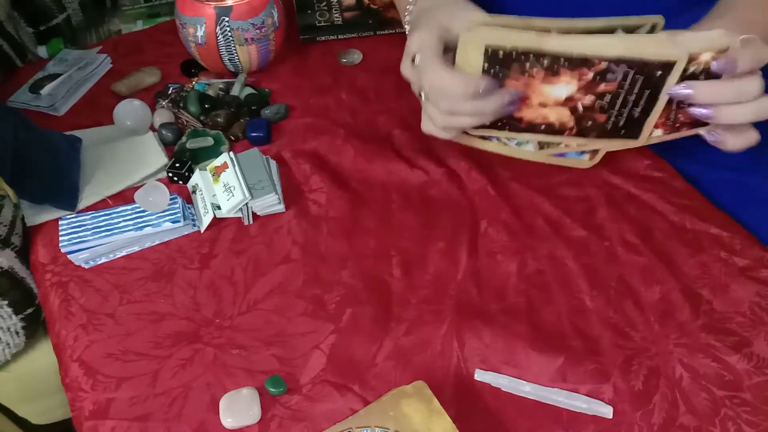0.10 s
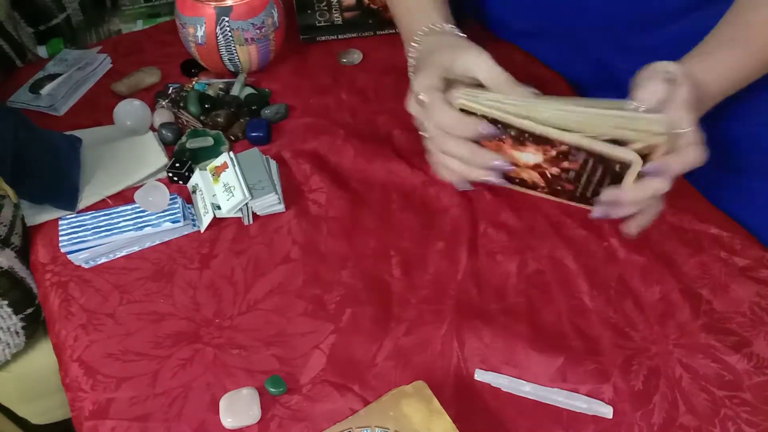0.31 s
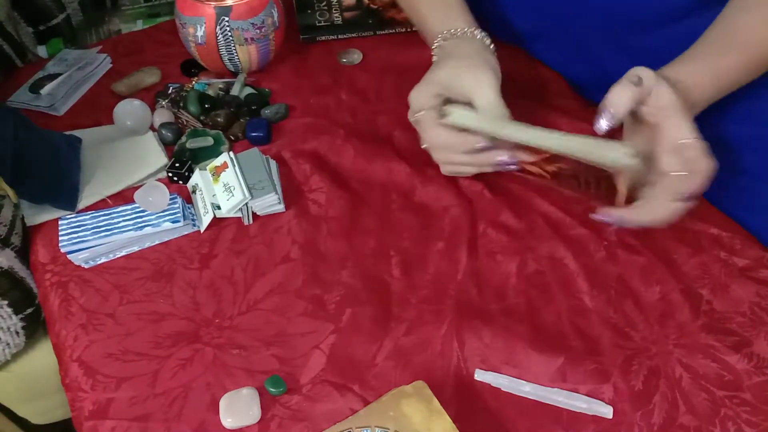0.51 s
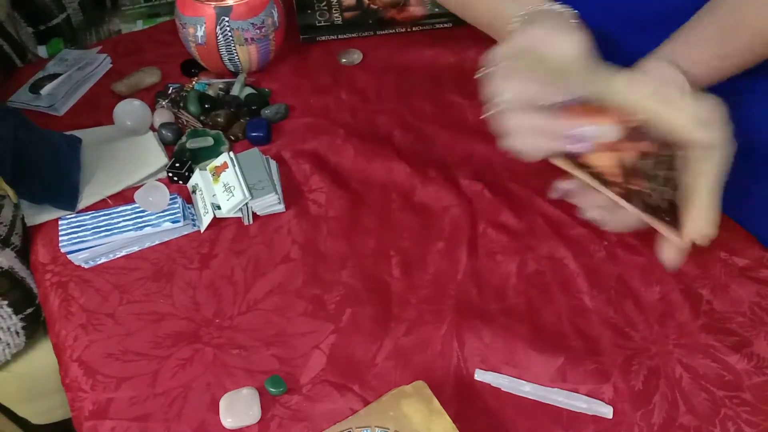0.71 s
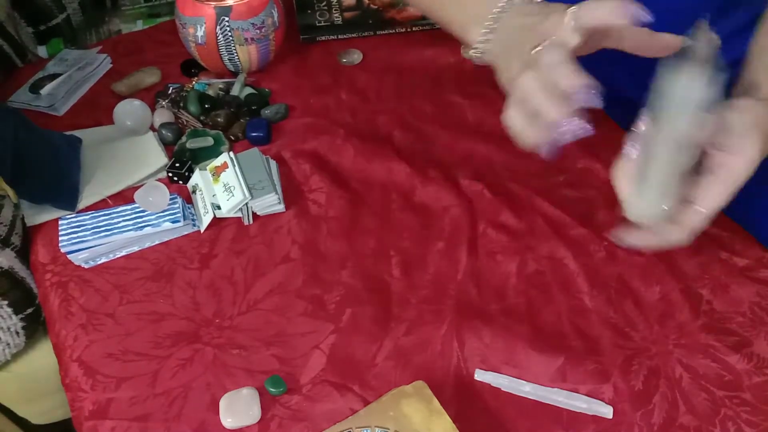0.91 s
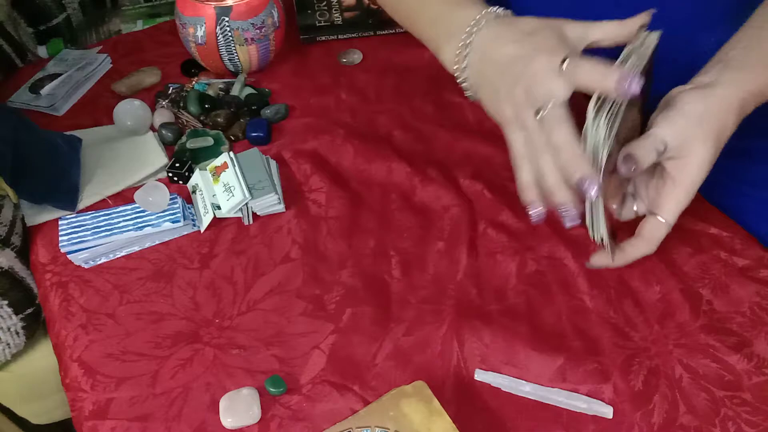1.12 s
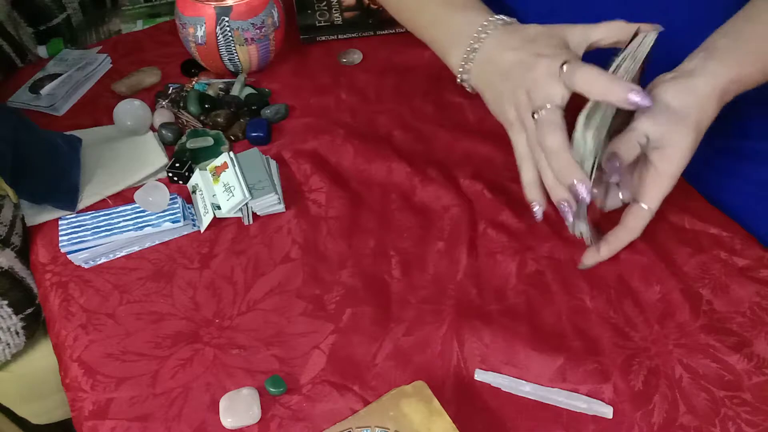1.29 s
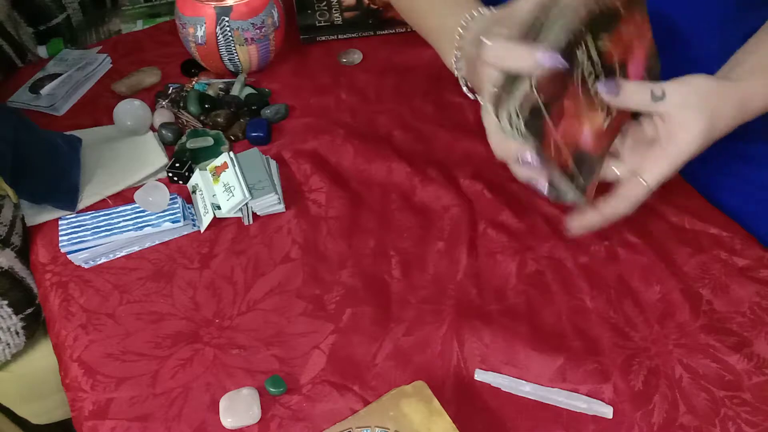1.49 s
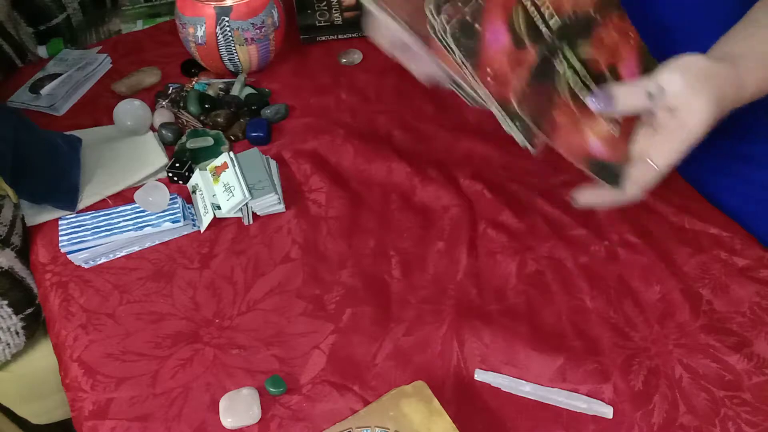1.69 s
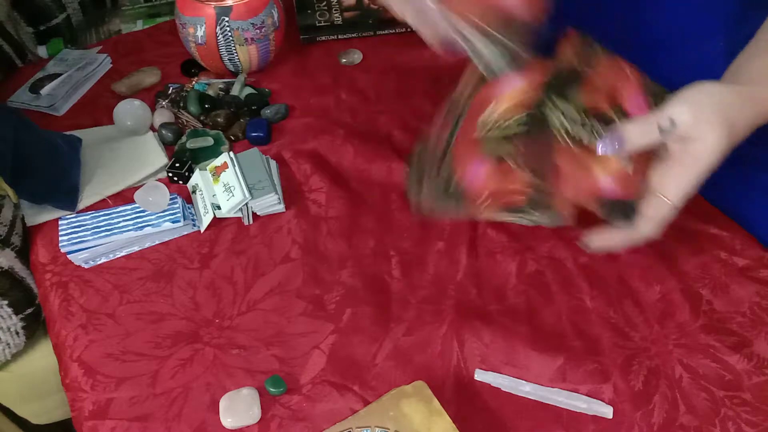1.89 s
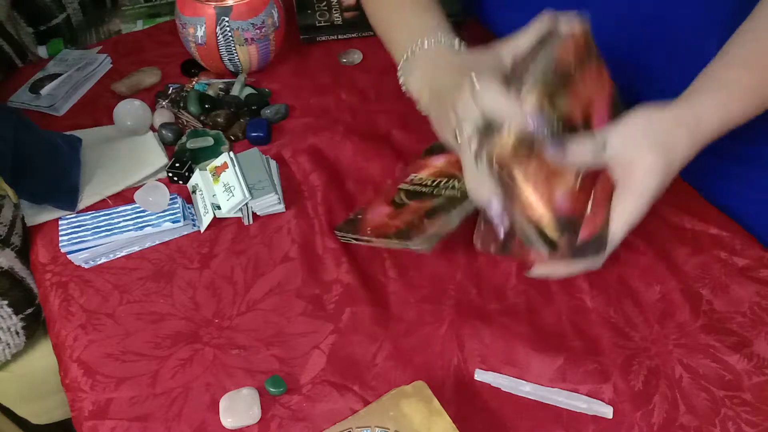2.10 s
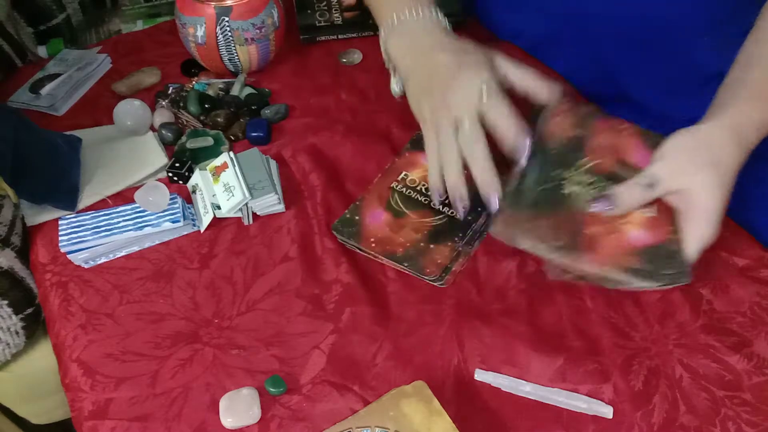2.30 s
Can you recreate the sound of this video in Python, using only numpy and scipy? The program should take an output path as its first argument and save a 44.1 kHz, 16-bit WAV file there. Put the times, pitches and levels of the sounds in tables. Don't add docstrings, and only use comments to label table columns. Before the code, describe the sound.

Large cards shuffled by hand close to the microphone: papery slides and a dull tap on the table, one loud snap, a quieter second, then more sliding, knocks and a card dropping on cloth, in a quiet room.

```python
import sys
import numpy as np
from scipy import signal
from scipy.fft import rfft, irfft, next_fast_len
from scipy.io import wavfile
from scipy.ndimage import uniform_filter1d, map_coordinates

SR = 44100
rng = np.random.default_rng(int(sys.argv[2]) if len(sys.argv) > 2 else 0)


def generate_wav(signal):
    frames = np.transpose(np.atleast_2d(signal))
    scaled = np.clip(frames, -1, 1) * 32767
    pcm = np.round(scaled).astype(np.int16)
    wavfile.write(sys.argv[1], SR, pcm)


def nominal_scale(level):
    x = np.asarray(level, float) / 20
    return 10 ** x


N = 110250

# pitch_hz, level_db (per Hz)
BACKGROUND_HISS = [(20, -38), (50, -8.5), (110, -4), (300, -8.5), (900, -15), (2100, -18.5), (8000, -30.5),
                   (15700, -32)]
# pitch_hz, level_db (per Hz)
AMPLIFIER_HISS = [(18, -41), (30, -4), (974, -7), (1270, -4), (1830, -8), (15600, -24.5)]
BACKGROUND_DB, AMPLIFIER_DB = -70, -76

# peak_s, level_db, fall_s, pitch_hz
RUBS = [(.01, -67, 0.034, 1260), (0.05, -46.5, 0.048, 1162), (.178, -63, 0.029, 2780),
        (0.416, -38.5, 0.011, 7560), (.5, -74.5, 0.31, 1260), (0.787, -54.5, 0.082, 1300),
        (0.84, -56, 0.015, 1280), (1.05, -66, 0.16, 1275), (1.032, -64, 0.034, 1600),
        (.37, -58, 0.24, 1244), (0.415, -38, 0.0052, 2440), (1.393, -73.5, 0.039, 6800),
        (1.48, -66, 0.053, 1680), (1.528, -73.5, 0.077, 1290), (1.59, -74, 0.095, 6900),
        (1.619, -71, 0.025, 3130), (1.673, -60, 0.024, 1290), (1.697, -38.5, 0.021, 1584),
        (1.76, -59, 0.019, 3900), (1.772, -54, 0.047, 10400), (1.8576, -49, 0.022, 1290),
        (1.97, -64, 0.027, 6700), (2.017, -39, 0.038, 1170), (2.067, -48, 0.014, 1800),
        (2.134, -41.5, 0.013, 7140), (2.18, -49, 0.08, 1510), (2.284, -64, 0.011, 9300),
        (2.2874, -48.5, 0.013, 1180), (1.08, -70, 0.08, 517)]
RUB_WIDTH, RUB_RISE = 0.07, 9

# peak_s, peak_db, pitch_hz, rise_s, fall_s
BENDS = [(.012, -53, 1234, 0.0097, 0.0087), (.045, -52, 650, 0.013, 0.018),
         (0.06, -38.5, 1083, 0.01, 0.0068), (0.067, -32, 1200, 0.0049, 0.0043),
         (.077, -40.5, 1290, 0.011, .012), (.085, -55.5, 596, 0.06, 0.02), (.12, -63, 1278, 0.022, 0.039),
         (0.201, -68, 1260, .015, 0.019), (.267, -22, 866, 0.0009, 0.0047),
         (.766, -32, 2850, 0.0016, 0.0061), (.865, -56, 1255, 0.015, 0.022),
         (0.999, -61.5, 1245, 0.02, 0.039), (1.1, -67, 1290, 0.072, .06), (1.362, -65, 130, 0.014, 0.018),
         (1.536, -64, 1263, 0.031, 0.037), (1.673, -45, 1296, 0.0033, 0.019),
         (1.79, -53, 1293, 0.022, 0.019), (1.81, -41.5, 873, .005, 0.0067),
         (1.822, -42.5, 1180, 0.0067, 0.0085), (2.007, -20, 3470, 0.0013, 0.0012),
         (2.0643, -27, 1755, .0008, 0.005), (2.185, -33, 179.5, 0.002, .014),
         (2.204, -41, 196.6, 0.0061, 0.043), (2.198, -38, 2910, 0.0099, .006),
         (2.188, -43, 3250, 0.003, .004), (2.265, -56, 1267, 0.0088, .015),
         (2.32, -54.5, 890, 0.014, 0.0086), (1.575, -70.5, 6830, 0.011, 0.024),
         (1.966, -56.5, 6760, 0.0033, .012), (2.0068, -17, 4800, 0.00033, 0.00051),
         (2.287, -37, 1510, .0005, 0.0015), (1.813, -44, 592, .006, 0.014), (.278, -32, 641, 0.013, 0.028),
         (2.105, -36, 750, 0.0029, 0.011)]

# peak_s, level_db, rise_s, fall_s, tilt_db (per octave)
BRUSHES = [(.04, -48, 0.028, 0.074, -3.5), (.175, -67, 0.017, 0.02, -4), (.27, -70, 0.048, 0.031, -1),
           (.682, -63.5, .003, .04, -14), (.745, -69, 0.046, .02, -8), (.6, -80, 0.064, 0.13, -9),
           (1.27, -75, 0.076, 0.12, -4.5), (1.48, -71.5, 0.08, 0.065, -4.5), (1.62, -67, 0.032, 0.047, -6),
           (1.812, -48, 0.015, 0.021, -9), (2.165, -49, 0.026, 0.018, -4), (2.2, -40.5, 0.0093, 0.05, -5.5)]
# peak_s, level_db, rise_s, fall_s, tilt_db (per octave)
SLIDES = [(.065, -47.5, 0.073, 0.057, -2), (.265, -47.5, 0.043, 0.038, 2.5),
          (.352, -45.5, 0.063, 0.077, -1.5), (0.519, -53.5, 0.063, 0.04, -5.5),
          (0.728, -54.5, 0.034, 0.04, 0), (0.852, -52, 0.041, 0.019, -1.5),
          (1.35, -65.5, 0.032, 0.033, -2.5), (1.44, -57.5, 0.095, 0.073, 6), (1.71, -54.5, 0.06, 0.052, -3),
          (1.769, -49.5, 0.042, 0.061, 1), (1.872, -60, 0.02, 0.097, -8.5), (1.941, -60, 0.025, 0.06, -4),
          (2.03, -38.5, 0.039, 0.029, -5), (2.075, -37.5, 0.046, 0.021, -6.5),
          (2.12, -39.5, 0.039, 0.052, -5), (2.205, -39, 0.036, 0.058, -2.5),
          (2.268, -56.5, 0.034, 0.072, -6), (2.319, -63, 0.024, 0.02, -5)]
# pitch_hz, level_db
CARD_COLOUR = [(150, -32), (500, -9), (1000, -1.5), (3800, 2), (4300, -2), (7400, -2.5)]
BUMP_DB, PATCH_DB = 2, 3.5

# time_s, force_db
SQUARING = [
    (.2235, -61),
    (.226, -59.5),
    (.245, -31.5),
    (.264, -27),
    (.278, -20),
    (.29, -26.5),
    (.318, -39.5),
    (.325, -53),
    (.348, -53.5),
]
# pitch_hz, width_hz, level_db
TABLE_TOP = [(100, 25, -7.5), (179.7, 30, -0.5), (317, 32, 2), (378, 59, -1.5), (465.6, 18, 11.5),
             (560, 18, -3.5), (847, 120, -6), (1290, 120, -4.5), (2300, 1500, -21.5)]
CONTACTS_PER_S, CONTACT_SPREAD_DB, CLOTH_SOFT_HZ = 2500, 3, 1800

KNOCK_TIMES = [.2245, .414, .53, .764, 1.35, 1.72, 1.807, 1.856, 1.921, 1.947, 1.991, 2.012, 2.04, 2.062,
               2.104, 2.183, 2.196, 2.317]
# peak_db, pitch_hz, t60_s (time to die away by 60 dB)
KNOCKS = [(-26, 220, 0.046), (-36.5, 660, 0.032), (-52, 127, 0.064), (-29, 504, 0.047), (-47, 133, 0.074),
          (-51.5, 142, 0.085), (-39, 750, 0.073), (-50.5, 610, 0.06), (-37, 660, 0.035), (-46, 750, 0.05),
          (-34, 295, 0.1), (-29.5, 526, 0.15), (-34, 161, 0.085), (-34, 180, 0.18), (-33.5, 710, 0.046),
          (-33.5, 220, 0.094), (-36, 240, 0.093), (-48, 1300, 0.056)]

# start_s, peak_db, tilt_db (per octave), t60_s
SNAPS = [(0.414, -32, 14, 0.026), (0.706, -41, 10, 0.16), (0.756, -35.5, 1.5, 0.2),
         (0.764, -13, 0.5, 0.057), (0.766, -20.5, 1.5, 0.15), (0.837, -50, 2, 0.028),
         (0.971, -42.5, 5, 0.17), (1.342, -39, 5, 0.039), (1.393, -42.5, 2, 0.077), (1.669, -34, -4, 0.065),
         (1.694, -29.5, -3, 0.059), (1.805, -31.5, -8.5, 0.13), (1.821, -49, -11.5, 0.09),
         (1.856, -48, -8.5, 0.025), (1.884, -41.5, -3, 0.044), (1.9125, -36.5, -4, 0.082)]
# start_s, peak_db, tilt_db (per octave)
FALL = [(1.992, -32.5, -3), (1.998, -23, -6), (2.004, -8, -1), (2.01, -19, -8), (2.022, -22.5, -2),
        (2.04, -28, -2), (2.062, -27, -3), (2.088, -34.5, 4), (2.096, -24, -1.1), (2.106, -35.5, -2.8),
        (2.19, -31, -1), (2.196, -23, 0.5), (2.2188, -26, -4), (2.2486, -28.5, -5), (2.286, -39, -6)]
CRACK_T60_S, RATTLE_GAIN, FALL_T60_S, CRACK_DELAY_S = 0.0036, 0.24, 0.04, 0.001

# pitch_hz, t60_s
ROOM = [(200, 0.21), (1300, 0.12), (8000, 0.11)]
ROOM_DB = -11.5
BOX_HZ, BOX_WIDTH_HZ, BOX_DB = 1275, 34, 12.5
# pitch_hz, level_db
MICROPHONE = [(40, -18), (110, 0), (7400, -0.5), (8100, -11.5), (13600, -16.5), (14900, -20.5), (15650, -7),
              (15850, -42)]


def unit(x):
    return x / np.sqrt(np.mean(x ** 2) + 1e-20)


def along(points, hz):
    point_hz, value = np.transpose(points)
    return np.interp(np.log(hz + 1), np.log(point_hz + 1), value)


def filtered(x, response):
    size = next_fast_len(x.shape[-1] + 8192)
    spectrum = rfft(x, size) * response(np.fft.rfftfreq(size, 1 / SR))
    return irfft(spectrum, size)[..., :x.shape[-1]]


def resonance(f, hz, width):
    return 1j * f * width / (hz * hz - f * f + 1j * f * width)


def wobble(rate, size):
    points = rng.standard_normal(int(size * rate / SR) + 4)
    return map_coordinates(points, [np.arange(size) * rate / SR])


def add(out, start_s, x):
    k = round(start_s * SR)
    out[max(k, 0):k + len(x)] += x[max(-k, 0):]


def hiss(spectrum):
    return unit(filtered(rng.standard_normal(N), lambda f: nominal_scale(along(spectrum, f)) * (f < 15750)))


def rubs():
    out, t = np.zeros(N + SR), np.arange(-SR // 5, SR // 5) / SR
    for peak_s, db, fall, hz in RUBS:
        rise = min(RUB_RISE * fall, 0.6)
        length = fall * np.where(t < 0, rise, 1)
        stroke = nominal_scale(-18 * (t / length) ** 2 + 2.5 * wobble(120, size=len(t)))
        width = RUB_WIDTH * hz * (hz / 1000) ** 0.9
        note = filtered(rng.standard_normal(len(t)), lambda f: resonance(f, hz, width) ** 1.2)
        add(out, peak_s + t[0], nominal_scale(db) * stroke * unit(note))
    return out[:N]


def bends():
    out, t = np.zeros(N + SR), np.arange(-SR // 10, SR // 5) / SR
    for peak_s, db, hz, rise, fall in BENDS:
        swell = nominal_scale(db - 20 * (t / np.where(t < 0, rise, fall)) ** 2)
        add(out, peak_s + t[0], swell * np.cos(2 * np.pi * hz * t))
    return out[:N]


def paper(tilt_db, size):
    bumps = rng.standard_normal(40)

    def colour(f):
        tilt = tilt_db * np.log2((f + 200) / 2500)
        own_bumps = BUMP_DB * map_coordinates(bumps, [f / 800], mode="nearest")
        return nominal_scale(along(CARD_COLOUR, f) + tilt + own_bumps)

    return unit(filtered(rng.standard_normal(size), colour))


def patchy(x):
    z = signal.stft(x, nperseg=128)[2]
    patches = uniform_filter1d(rng.standard_normal(z.shape), size=4, axis=0)
    patches = uniform_filter1d(patches, size=6, axis=1)
    return signal.istft(z * nominal_scale(PATCH_DB * unit(patches)), nperseg=128)[1][:len(x)]


def friction(strokes):
    out, t = np.zeros(N + SR), np.arange(-SR // 5, SR // 5) / SR
    for peak_s, db, rise, fall, tilt in strokes:
        stroke = nominal_scale(-18 * (t / np.where(t < 0, rise, fall)) ** 2)
        level = nominal_scale(db + 0.43 * wobble(110, size=len(t)))
        add(out, peak_s + t[0], level * stroke * unit(patchy(paper(tilt, size=len(t)))))
    return out[:N]


def brushes():
    return friction(BRUSHES)


def slides():
    return friction(SLIDES)


def table_top(f):
    ring = sum((-1) ** k * nominal_scale(db) * resonance(f, hz, width)
               for k, (hz, width, db) in enumerate(TABLE_TOP))
    return ring / (1 + 1j * f / CLOTH_SOFT_HZ) ** 2


def squaring():
    time_s, force_db = np.transpose(SQUARING)
    chance, strength = rng.random((2, N))
    hits = (chance < CONTACTS_PER_S / SR) * nominal_scale(-CONTACT_SPREAD_DB * np.log(strength + 1e-3))
    hits = hits * np.sign(rng.standard_normal(N))
    ring = filtered(hits, table_top)
    even = ring / np.sqrt(np.abs(uniform_filter1d(ring ** 2, size=500)) + 1e-12)
    force = nominal_scale(np.interp(np.arange(N) / SR, time_s, force_db, left=-120, right=-120))
    return even * uniform_filter1d(force, size=40)


def knocks():
    out, t = np.zeros(N + SR), np.arange(SR // 4) / SR
    for start_s, (db, hz, t60) in zip(KNOCK_TIMES, KNOCKS):
        push = np.sin(2 * np.pi * hz * t) * nominal_scale(-60 * t * hz / 5.5)
        noise = rng.standard_normal(len(t))
        rumble = unit(filtered(noise, lambda f: resonance(f, hz, 0.74 * hz) ** 2))
        wave = push + 0.6 * rumble * np.minimum(t * hz, 1)
        add(out, start_s, nominal_scale(db) * wave * nominal_scale(-60 * t / t60))
    return out[:N]


def cracks(events):
    out, t = np.zeros(N + SR), np.arange(SR // 5) / SR
    for start_s, db, tilt, t60 in events:
        shape = nominal_scale(-60 * t / CRACK_T60_S) + RATTLE_GAIN * nominal_scale(-60 * t / t60)
        shape = shape * (1 - np.exp(-t / 0.00014))
        add(out, start_s + CRACK_DELAY_S, nominal_scale(db - 2.5) * shape * paper(tilt, size=len(t)))
    return out[:N]


def snaps():
    return cracks(SNAPS)


def falling_card():
    return cracks([(*row, FALL_T60_S) for row in FALL])


def room(x):
    out, step = np.zeros(N + SR), SR // 5
    for k in range(0, N, step):
        hz, t, z = signal.stft(rng.standard_normal(SR // 3), SR, nperseg=256)
        decay = nominal_scale(-60 * t / along(ROOM, hz)[:, None])
        tail = signal.istft(z * decay, SR, nperseg=256)[1]
        echoes = signal.fftconvolve(x[k:k + step], tail / np.linalg.norm(tail))
        add(out, k / SR + 0.004, echoes)
    return out[:N]


def cavity(x):
    return filtered(x, lambda f: (nominal_scale(BOX_DB) - 1) * resonance(f, BOX_HZ, BOX_WIDTH_HZ))


def microphone(x):
    return filtered(x, lambda f: nominal_scale(along(MICROPHONE, f)))


def scene():
    cards = slides() + snaps() + falling_card() + knocks()
    near = cards + squaring() + rubs() + bends()
    near = near + nominal_scale(ROOM_DB) * room(near) + cavity(cards)
    background = nominal_scale(BACKGROUND_DB + 2.1 * wobble(2.5, size=N)) * hiss(BACKGROUND_HISS)
    middle = microphone(near) + microphone(brushes()) + background
    side = nominal_scale(AMPLIFIER_DB) * hiss(AMPLIFIER_HISS)
    return np.array([middle + side, middle - side])


def roll_off(x):
    return signal.sosfilt(signal.butter(12, 16800, fs=SR, output="sos"), x)


def record(dry):
    mix = filtered(dry, lambda hz: hz < 16800)
    return roll_off(mix)


dry = scene()
out = record(dry)
generate_wav(out)
```